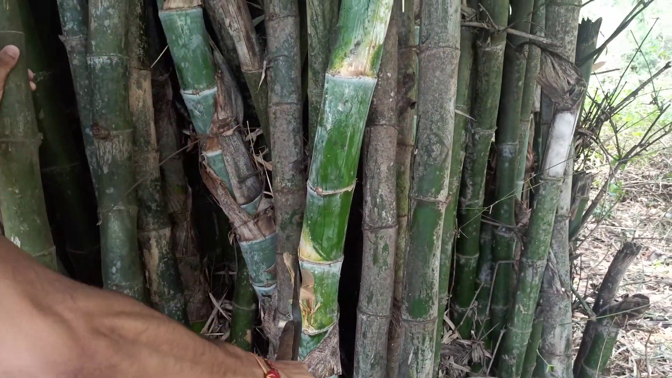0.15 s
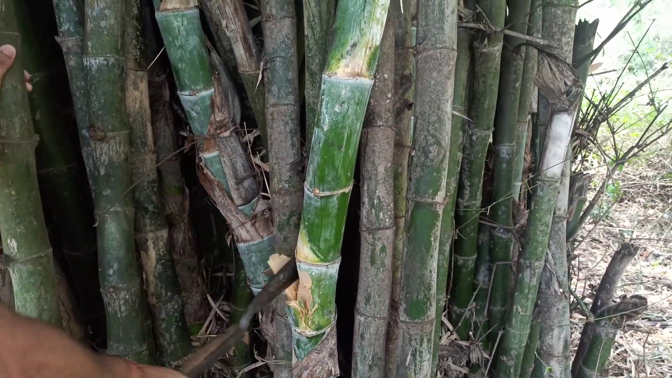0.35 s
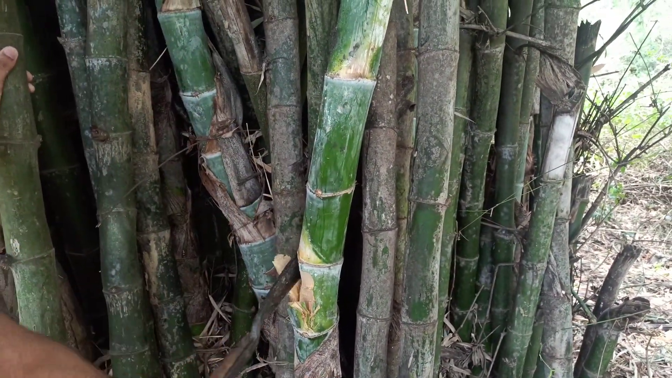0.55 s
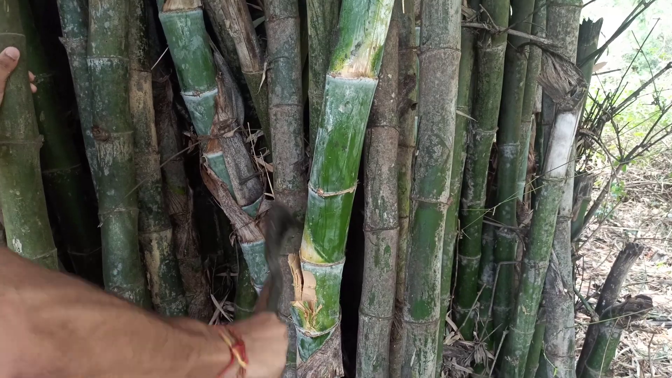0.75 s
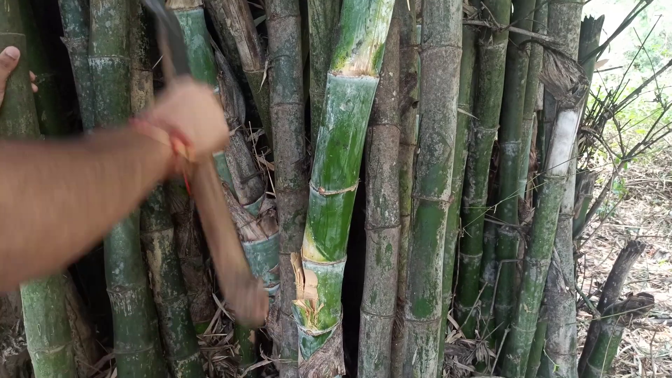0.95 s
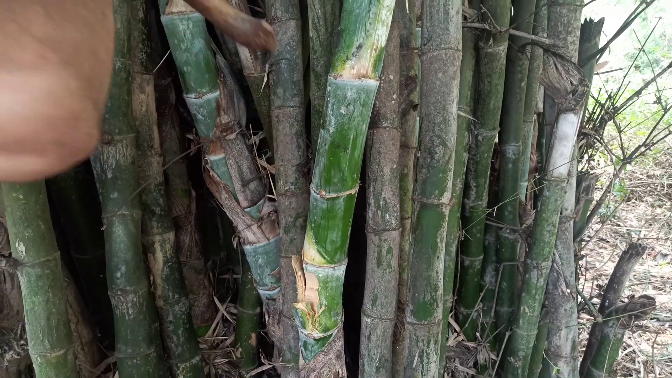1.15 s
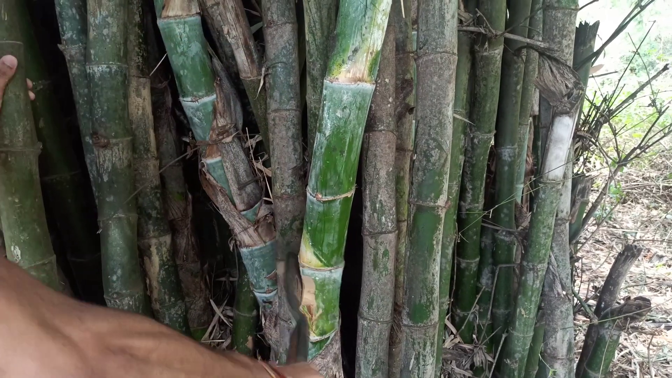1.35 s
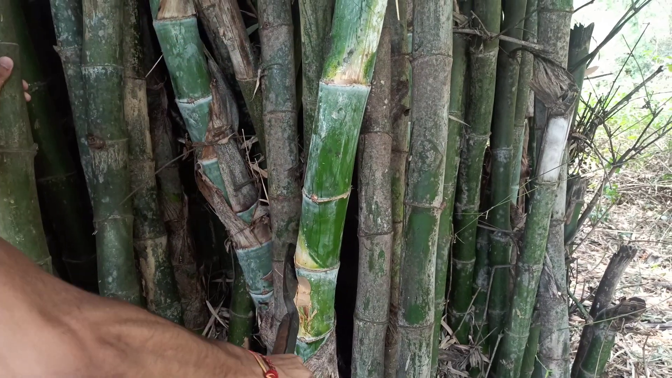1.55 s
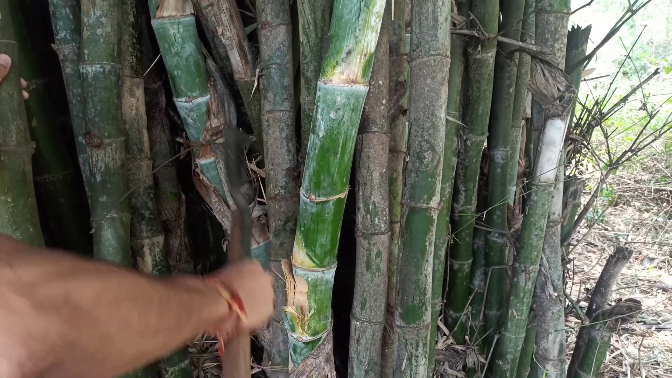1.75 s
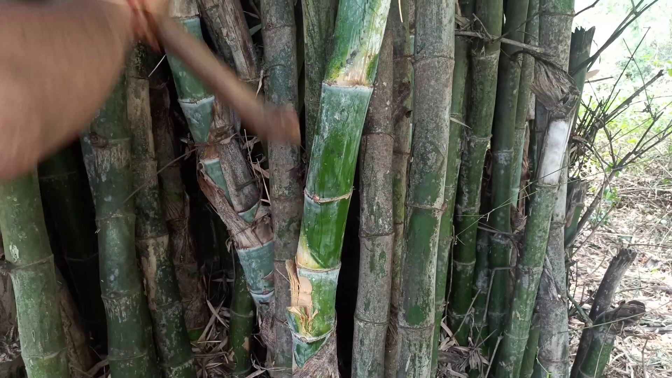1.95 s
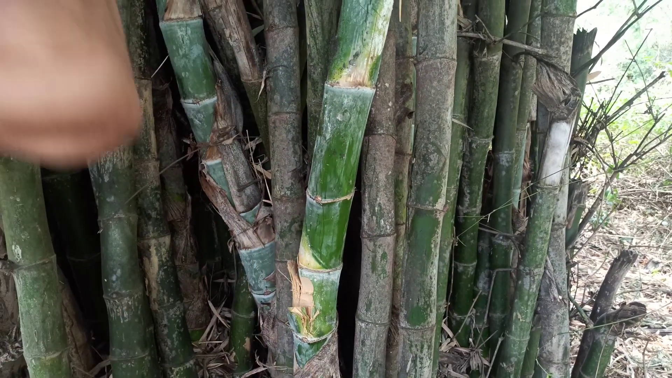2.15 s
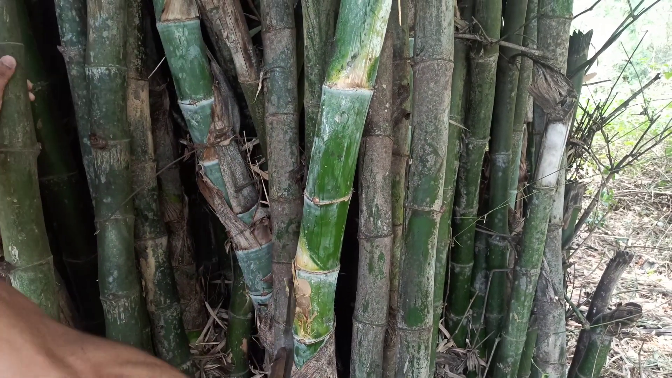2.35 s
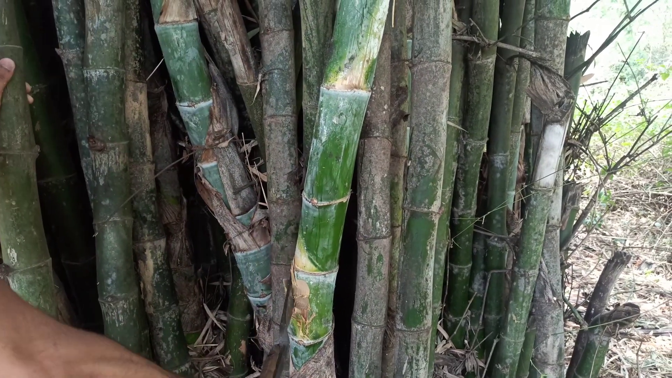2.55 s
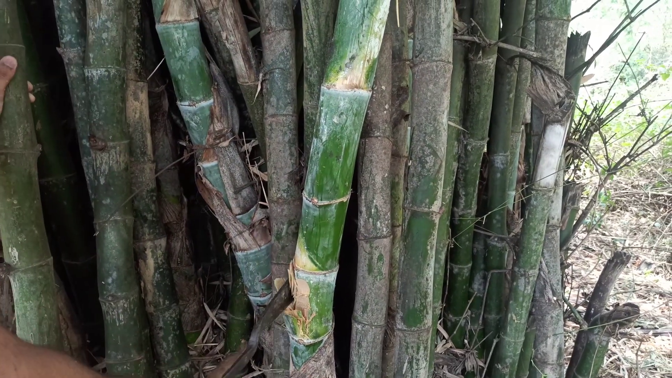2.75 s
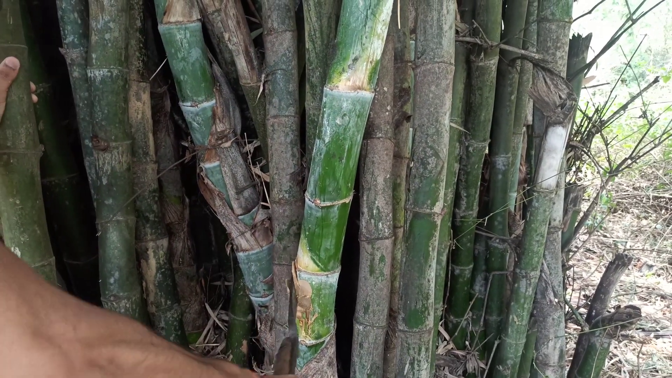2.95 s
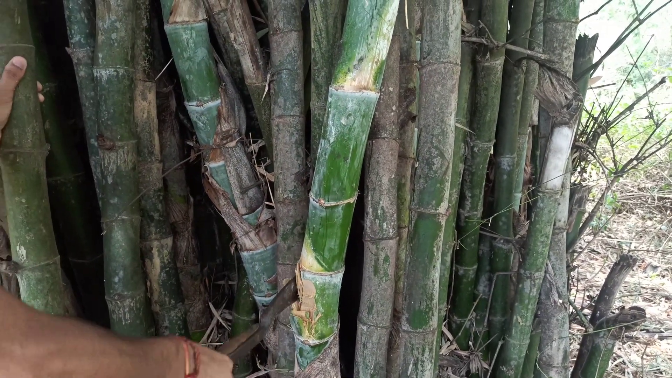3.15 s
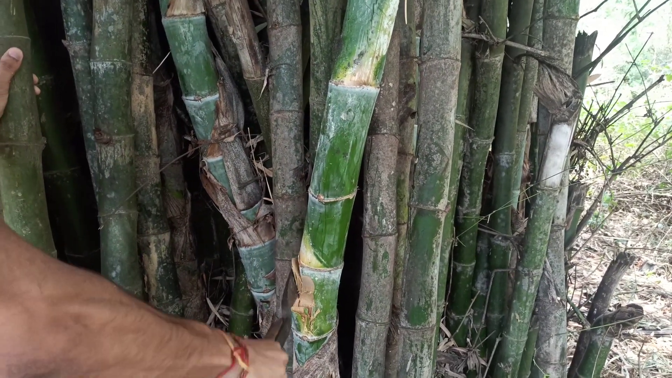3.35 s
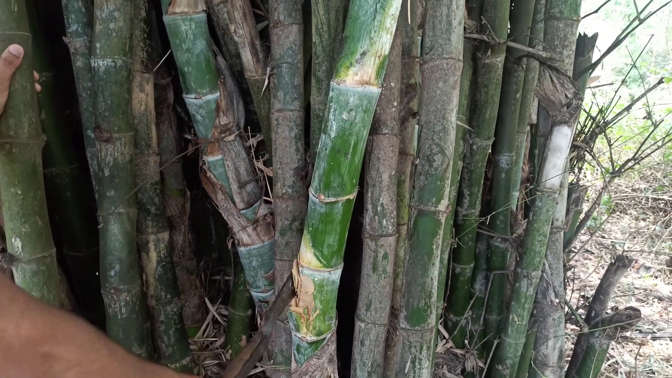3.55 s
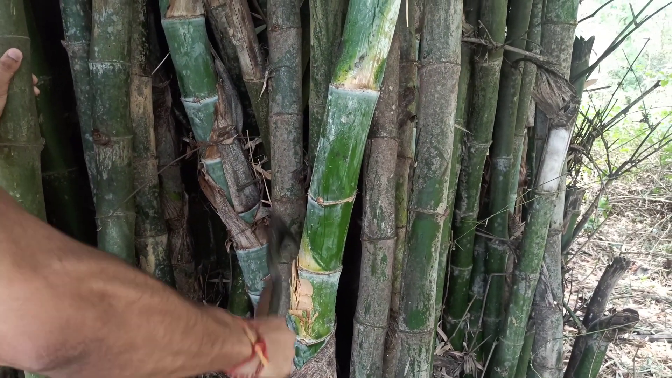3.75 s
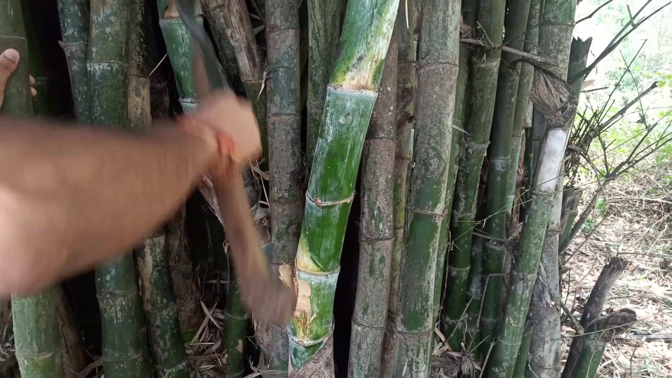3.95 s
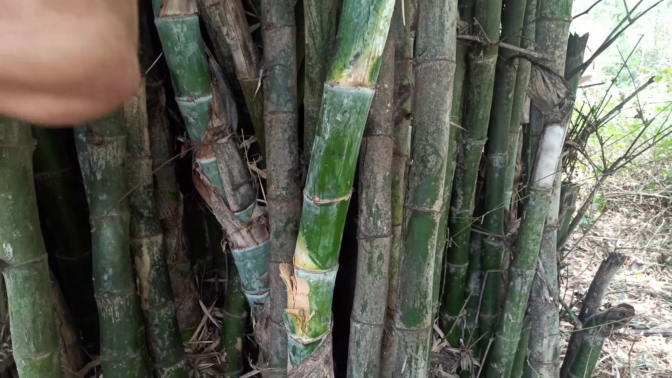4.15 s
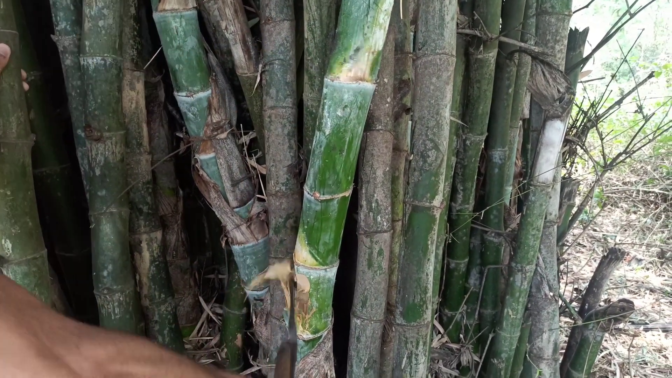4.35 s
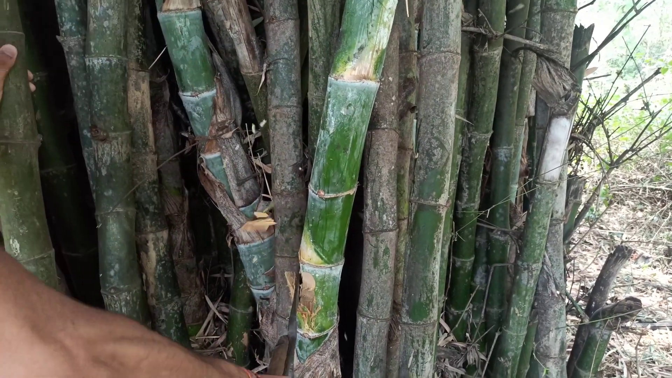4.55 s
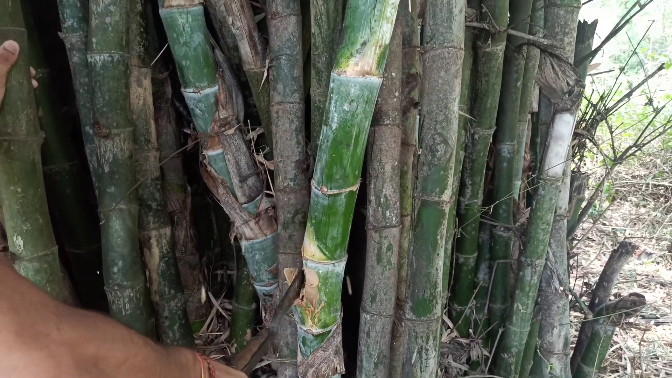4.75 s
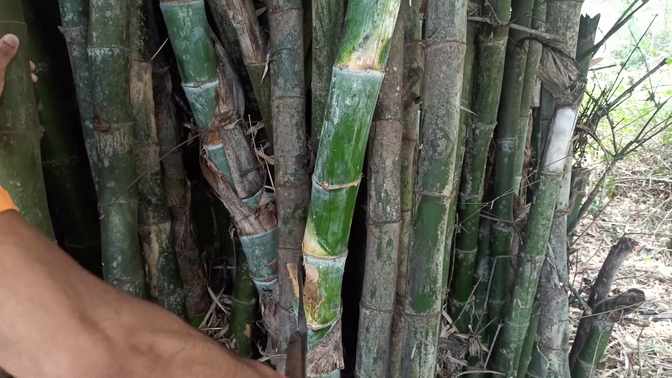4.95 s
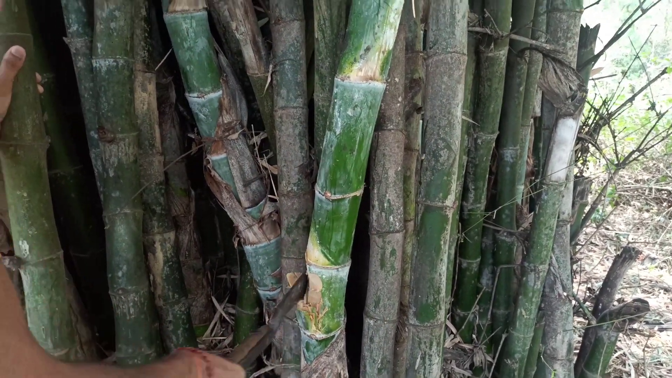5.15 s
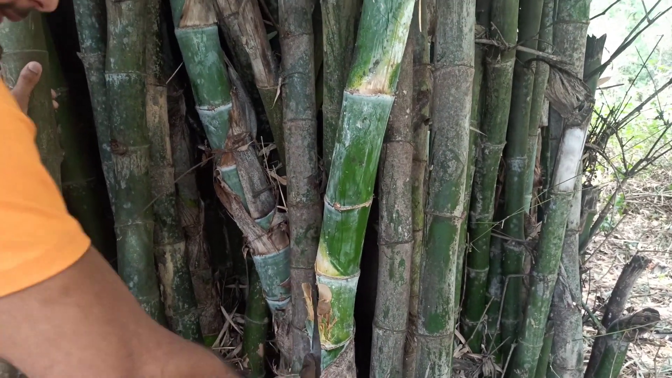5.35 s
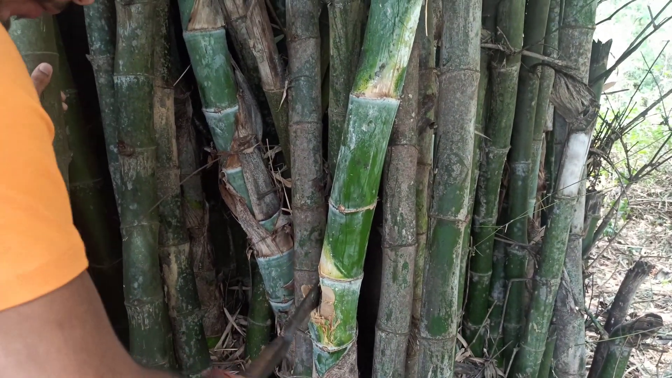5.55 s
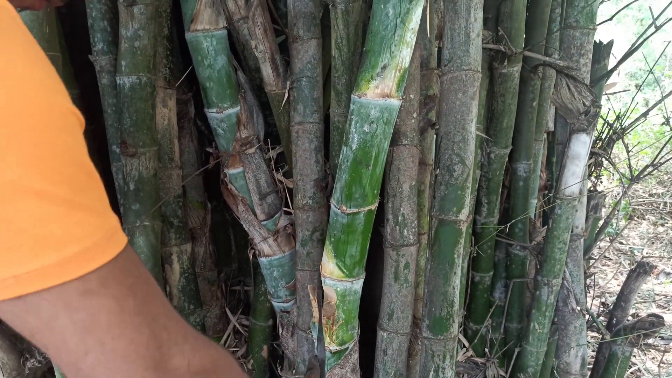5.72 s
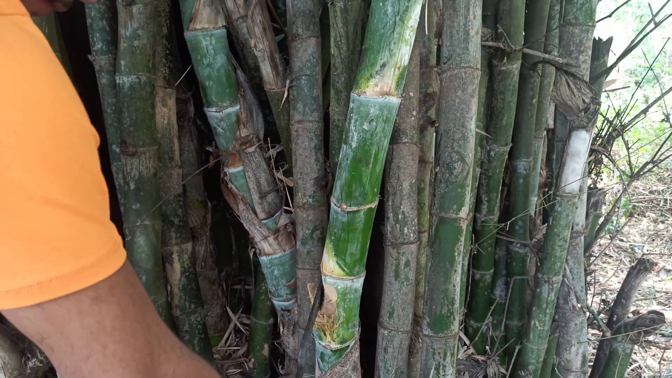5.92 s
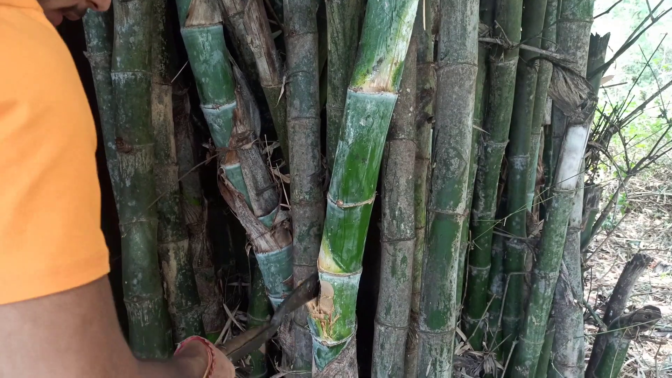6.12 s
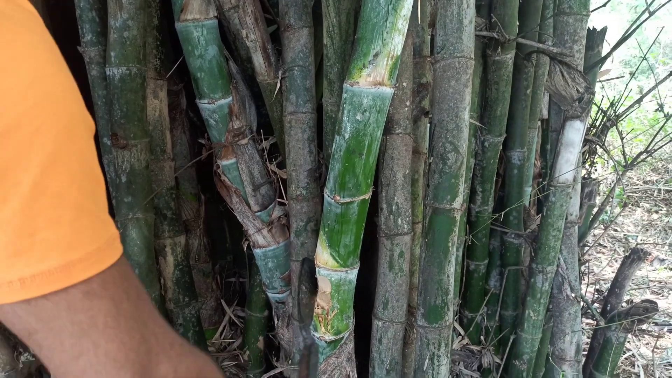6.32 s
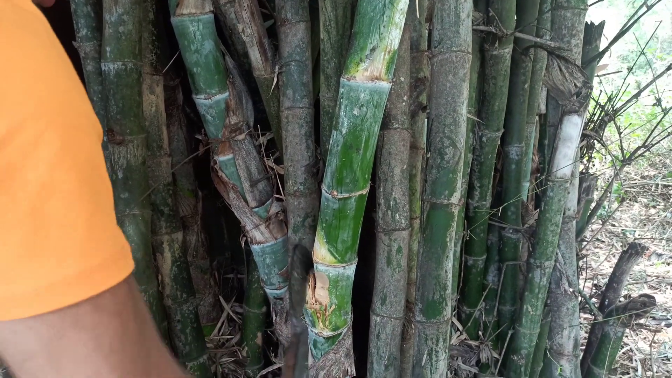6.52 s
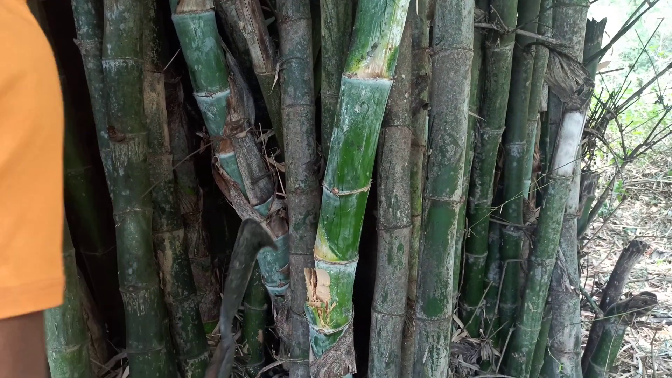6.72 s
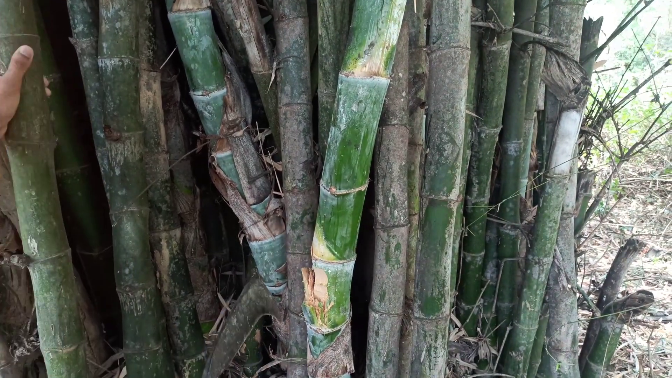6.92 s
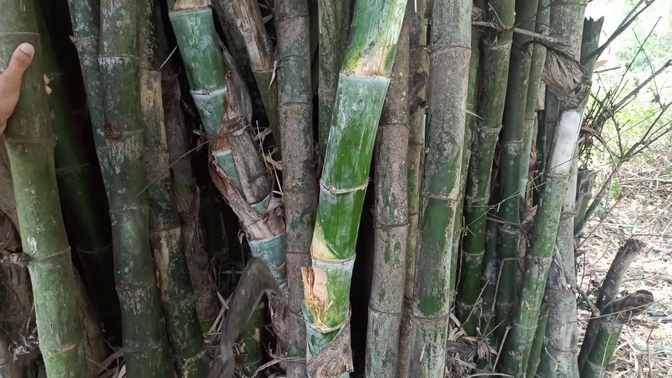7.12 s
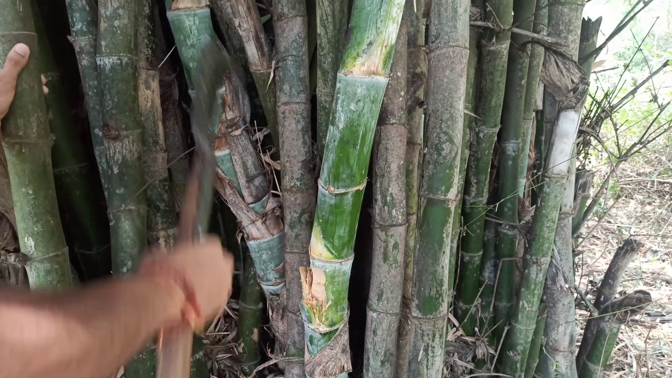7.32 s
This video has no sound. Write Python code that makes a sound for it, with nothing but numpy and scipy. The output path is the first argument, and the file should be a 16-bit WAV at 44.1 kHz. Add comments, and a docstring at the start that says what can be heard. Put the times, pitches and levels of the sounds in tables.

```python
"""A heavy blade chops four times into a green bamboo culm, close by: bursts of fibre noise over damped modes.
The grove's stalks scatter each blow into a decaying noise tail; parting fibres crackle after it.
Between blows the blade scrapes and clinks, splinters snap, dry leaves rustle as random grains,
and cut pieces thud down as damped resonances. A far bird whistles in falling glides and short rising
notes, as sines of gliding pitch, over the faint noise of the grove's air."""
import sys
import numpy as np
from scipy import signal
from scipy.fft import rfft, irfft, next_fast_len
from scipy.io import wavfile
from scipy.ndimage import map_coordinates

SR = 44100
rng = np.random.default_rng(int(sys.argv[2]) if len(sys.argv) > 2 else 0)


def int16_out(signal):
    """Quantize to a 16-bit WAV file."""
    q = np.round(np.clip(np.atleast_2d(signal).T, -1, 1) * 32767)
    wavfile.write(sys.argv[1], SR, q.astype(np.int16))


N = 329868
T = np.arange(SR // 2) / SR  # time base of one event, s


def amp(db):
    """Decibels to gain."""
    return 10 ** (np.asarray(db) / 20)


def unit(x):
    """x at rms 1."""
    return x / np.sqrt(np.mean(x ** 2) + 1e-20)


def along(points, hz):
    """(Hz, value) points interpolated on a log frequency axis."""
    f, v = np.transpose(points)
    return np.interp(np.log(hz + 1), np.log(f + 1), v)


def wobble(rate_hz):
    """A random curve of straight segments, rate_hz knots a second."""
    knots = rng.standard_normal(int(N * rate_hz / SR) + 4)
    return map_coordinates(knots, [np.arange(N) * rate_hz / SR], order=1)


def filtered(x, response):
    """x times a response of frequency."""
    n = x.shape[-1]
    m = next_fast_len(n + 4096)
    return irfft(rfft(x, m) * response(np.fft.rfftfreq(m, 1 / SR)), m)[..., :n]


def resonance(hz, centre_hz, q):
    """Causal band-pass response."""
    damping = 1j * hz * centre_hz / q
    return damping / (centre_hz ** 2 - hz ** 2 + damping)


def spread(pair, gain, alike):
    """Two unrelated signals become left and right, coloured, with the given likeness."""
    def response(hz):
        turn = np.arccos(np.clip(along(alike, hz), -1, 1)) / 2
        return gain(hz) * np.array([np.cos(turn), np.sin(turn)])
    mid, side = filtered(pair, response)
    return np.array([mid + side, mid - side])


def noise(spectrum, alike, size):
    """Coloured stereo noise of rms 1."""
    pair = rng.standard_normal((2, size))
    return unit(spread(pair, lambda hz: amp(along(spectrum, hz)), alike))


def burst(t, rise, t60):
    """An envelope that swells 60 dB in rise s up to t = 0, then dies away 60 dB in t60 s."""
    return amp(-60 * np.where(t < 0, -t / rise, t / t60))


def ring(modes, size, detune):
    """Struck modes; each strike draws new mode strengths, pitches and phases."""
    hz, db, t60 = np.transpose(modes)[..., None]
    strength, shift, phase = rng.standard_normal((3, len(modes), 1))
    t = T[:size]
    decay = amp(db + 2 * strength - 60 * t / t60)
    tones = np.sin(2 * np.pi * (hz * (1 + detune * shift) * t + phase))
    onset = 1 - np.exp(-t / 0.00097)
    return np.sum(decay * tones, 0) * onset


def crackle(rate, spread_db, life_s, size):
    """An envelope of tiny cracks at random moments, rate a second, of random strength."""
    strength = amp(spread_db * np.minimum(rng.exponential(size=size), 4))
    hits = (rng.random(size) < rate / SR) * strength
    return unit(signal.lfilter([1], [1, -np.exp(-1 / (life_s * SR))], hits))


def lagged(x, left_lead_s):
    """A source off to the left reaches that port sooner."""
    return filtered(x, lambda hz: np.exp(1j * np.pi * hz * left_lead_s * np.array([[1], [-1]])))


def add(track, s, sound):
    """Mix a sound into the track at s seconds."""
    start = round(s * SR)
    part = sound[..., max(-start, 0):N - start]
    track[:, max(start, 0):][:, :part.shape[-1]] += part


# Spectrum of the air. Each row: frequency in Hz, relative density in dB.
AIR_SPECTRUM = [(25, -30), (50, -7.5), (90, 3), (130, -1), (250, -7.5), (600, -12.5), (1200, -19),
                (3000, -19), (7000, -17), (15000, -32)]
# Diffuse sound. Each row: frequency in Hz, left-right likeness (1 = identical).
DIFFUSE_LIKENESS = [(25, 0.18), (70, 0.55), (130, 0.4), (290, 0.47), (640, 0.51), (1400, 0.0011), (3000, 0),
                    (15000, 0.62)]


def air():
    """Faint noise from all around, slowly uneven in level."""
    return amp(-55.0 + 1.3 * wobble(1.7)) * noise(AIR_SPECTRUM, DIFFUSE_LIKENESS, size=N)


# Stalk scattering. Each row: frequency in Hz, tail gain in dB.
SCATTER_GAIN = [(40, -22), (110, 9.5), (180, 1.5), (280, 10.5), (480, 2), (750, 6), (1100, -3.5),
                (2200, -3.5), (4200, -10), (7000, -4.5), (14000, -11.5)]
# Tail decay. Each row: frequency in Hz, t60 in s.
GROVE_T60 = [(80, 0.89), (250, 0.23), (600, 0.37), (1500, 0.53), (4000, 0.42), (12000, 0.38)]


def grove(x):
    """Stalks scatter sound into a short dense noise tail, with a brief slight swell at 70 ms."""
    hz, t, z = signal.stft(rng.standard_normal((2, len(T))), SR, nperseg=256)
    swell = np.exp(-((t - .07) / 0.0072) ** 2)
    swell_db = along([(300, 2.8), (1200, 0.89), (5000, 2.8)], hz)[:, None] * swell
    decay_db = -60 * t / along(GROVE_T60, hz)[:, None]
    tail = signal.istft(z * amp(swell_db + decay_db), SR, nperseg=256)[1][:, :len(T)]
    tail = tail * (1 - np.exp(-T / 0.0021))
    tail = tail / np.linalg.norm(tail[0])
    tail = spread(tail, lambda f: amp(along(SCATTER_GAIN, f)), DIFFUSE_LIKENESS)
    return signal.fftconvolve(x, tail, axes=1)


def scatter(x):
    """A fresh tail for each stretch of sound, as the source shifts among the stalks."""
    out, step = np.zeros((2, N)), SR * 2 // 3
    for start in range(0, N, step):
        add(out, start / SR, grove(x[:, start:start + step]))
    return out


def all_round(source, count):
    """A breaking wall radiates differently in each direction, and other stalks answer each one."""
    return sum(scatter(source()) for _ in range(count)) / np.sqrt(count)


# Falling whistles. Each row: start in seconds, length in s, end pitch in Hz, relative level in dB.
WHISTLES = [(2.099, 0.26, 3750, -61), (2.928, 0.18, 2270, -65), (3.448, 0.29, 3585, -59.5),
            (3.732, 0.25, 3406, -64.5)]
# Short rising notes. Each row: start in seconds, end pitch in Hz, relative level in dB.
FLICKS = [(3.602, 4550, -59), (3.785, 4500, -67), (3.865, 4650, -63), (4.29, 3900, -57.5)]
WHISTLE_FALL_HZ = 720  # start above end pitch
FLICK_S, FLICK_RISE_HZ = .065, 507  # length; start below end pitch


def bird():
    """Each note glides quickly, then levels off, quavering in pitch and strength."""
    out, quaver, flutter = np.zeros((2, N)), wobble(70), amp(3 * wobble(45))
    falling = [(s, length, WHISTLE_FALL_HZ, hz, db) for s, length, hz, db in WHISTLES]
    rising = [(s, FLICK_S, -FLICK_RISE_HZ, hz, db) for s, hz, db in FLICKS]
    for s, length, glide_hz, end_hz, db in falling + rising:
        u = np.linspace(0, 1, int(length * SR))
        now = slice(int(s * SR), int(s * SR) + len(u))
        hz = (end_hz + glide_hz * (1 - u) ** 4) * (1 + 0.0075 * quaver[now])
        shape = np.abs(np.sin(np.pi * u ** 0.62)) ** .5
        tone = np.sin(2 * np.pi * np.cumsum(hz) / SR)
        add(out, s, amp(db + 6.5) * flutter[now] * shape * tone)
    return out


# Stirring of dry leaves and fibres. Each row: time in seconds, relative level in dB.
STIR = [(0.2, -64), (0.44, -45.5), (0.62, -57.5), (1.15, -57.5), (1.62, -50.5), (1.88, -59), (2.33, -56.5),
        (2.66, -47), (3.0, -58.5), (3.85, -66.5), (4.35, -60), (4.98, -44.5), (5.45, -49), (5.75, -55.5),
        (6.02, -48.5), (6.42, -58.5), (6.9, -52.5), (7.2, -44), (7.48, -51.0)]


def stirring(s):
    """Stirring level in dB at s seconds, interpolated between rows."""
    return np.interp(s, *np.transpose(STIR))


# Spectrum of the leaves. Each row: frequency in Hz, relative density in dB.
LEAF_SPECTRUM = [(60, -40), (300, -4.5), (1000, -3), (2400, -6.5), (4200, 2.5), (7000, 7.5), (11000, -5.5),
                 (15000, 0.5)]
RUSTLE_OVER_STIR_DB, RUSTLE_SWAY_DB = 5, 1.5


def rustle():
    """Countless tiny cracks of dry leaves, with sparser, more uneven ones among them."""
    level_db = stirring(np.arange(N) / SR) + RUSTLE_OVER_STIR_DB + RUSTLE_SWAY_DB * wobble(9)
    fine = crackle(rate=460, spread_db=1.5, life_s=0.0019, size=N)
    coarse = crackle(rate=36, spread_db=6.5, life_s=0.0053, size=N)
    leaves = noise(LEAF_SPECTRUM, [(300, 0.56), (3000, 0.16), (12000, 0.37)], size=N)
    grains = unit((fine + 0.67 * coarse + .5) * leaves)
    return lagged(amp(level_db + 0.14 * wobble(45)) * grains, left_lead_s=0.000223)


# Near sound. Each row: frequency in Hz, left-right likeness (1 = identical).
DIRECT_LIKENESS = [(40, .6), (130, 1), (500, 1), (2000, 0.81), (7000, 0.41), (15000, 0.22)]
# Landing chips and chunks. Each row: start in seconds, relative level in dB, pitch in Hz,
# relative litter crunch in dB.
THUDS = [(0.629, -38.5, 1180, -7), (0.992, -36, 1130, -5.5), (3.701, -41, 740, -1), (4.734, -35, 900, -33),
         (4.841, -27.5, 900, 4.5), (5.0857, -7, 520, -12), (5.0984, -11, 574, -11), (6.075, -44, 600, -18),
         (6.207, -36, 686, -8), (6.586, -31.5, 473, -8.5), (6.602, -35.5, 433, -15)]
# Short bamboo piece on soil. Each row: multiple of its pitch, relative level in dB, sharpness Q.
CHUNK_MODES = [(.55, 3.5, 1.96), (1.05, 5, 2.7), (1.75, 5, 5.8), (3.5, -13.5, 3.3)]


def thuds():
    """A piece of bamboo lands: a quickly damped knock, grit grinding under it, and a crunch of litter."""
    out, t = np.zeros((2, N)), T[:SR // 8]
    litter_spectrum = [(300, -8.0), (1500, 2.5), (2800, -3.5), (4200, 4.0), (7000, 8), (15000, -9.5)]
    for s, db, hz, crunch_db in THUDS:
        grit = amp(-18.5 - 60 * t / 0.027) * rng.standard_normal(len(t))
        contact = 1. * (t == 0) + grit

        def body(f):
            return sum((-1) ** k * amp(level) * resonance(f, ratio * hz, q)
                       for k, (ratio, level, q) in enumerate(CHUNK_MODES))

        # soft contact dulls the treble
        knock = filtered(contact, lambda f: body(f) / (1 + 1j * f / (5.1 * hz)))
        litter = noise(litter_spectrum, DIRECT_LIKENESS, size=len(t))
        crunch = amp(crunch_db) * burst(t - .001, rise=0.011, t60=0.14) * litter
        add(out, s, amp(db) * (0.075 * unit(knock) + crunch))
    return out


TWIGS_PER_S, TWIG_OVER_STIR_DB, TWIG_SPREAD_DB, TWIG_WOOD_DB = 6, 18.5, 0.5, -17.5


def twigs():
    """Lesser snaps at uneven intervals, stronger the more the litter is stirred: rows as in SNAPS."""
    draws = rng.random((80, 3))
    times = (np.arange(len(draws)) + draws[:, 0]) / TWIGS_PER_S
    strength_db, wood_db = TWIG_SPREAD_DB * (2 * draws[:, 1:].T - 1)
    levels_db = stirring(times) + TWIG_OVER_STIR_DB + strength_db
    rows = np.transpose([times, levels_db, TWIG_WOOD_DB + wood_db])
    return rows[times < N / SR]


# Clearest splinter and twig snaps. Each row: start in seconds, relative level in dB,
# relative wood level under the tick in dB.
SNAPS = [(0.2862, -22, -39), (0.4259, -13, -43), (0.5488, -29.5, -12), (0.7556, -17, -15.5),
         (0.8006, -26.5, -28), (0.846, -35.5, -7), (0.928, -35.5, -11.5), (1.1808, -24.5, -19),
         (1.4045, -20.5, -4), (1.5574, -28.5, -1), (1.8305, -32, -6), (1.9475, -21.5, -51),
         (2.0703, -15, -21.5), (2.5052, -16, -17.5), (2.7819, -23.5, -21), (2.811, -24.5, -21.5),
         (2.9219, -28, -20.5), (2.9741, -28, -24), (4.131, -34, -13.5), (4.782, -23.5, -16.5),
         (4.9533, -22.5, -6.5), (4.9654, -6, -25), (5.7184, -23.5, -35), (5.8708, -32.5, -17),
         (6.0095, -18.5, -33), (6.0324, -22, -19.5), (6.1564, -22, -25), (6.2058, -23.5, -14),
         (6.5365, -32.5, -12), (7.0982, -23, -40), (7.1796, -21, -39), (7.3667, -28, -19.5)]
# Spectrum of breaking fibre. Each row: frequency in Hz, relative density in dB.
SPLINTER_SPECTRUM = [(100, -40), (1200, -52), (2800, -15), (4200, -4), (7000, 3), (9500, 6.5), (15000, -23)]
SNAP_BODY_DB, SNAP_LEFT_OVER_RIGHT_DB = -5, -1.5
# less wood than THIN_WOOD_DB tilts the tick brighter: dB per octave for each dB
THIN_WOOD_DB, THIN_TILT = -21.5, 0.4


def snaps(rows):
    """A sharp tick of breaking fibre, brighter when thinner, with the short knock of the wood that held it."""
    out, t = np.zeros((2, N)), T[:SR // 12] - .005
    size = len(t)
    middle_spectrum = [(700, -17), (1500, 1.5), (2600, 0.5), (4500, -6.0)]
    body_spectrum = [(120, -9.5), (330, 0.0), (900, 4.0), (2000, -46.5)]
    for s, db, wood_db in rows:
        fraying = amp(-0.5) * burst(t, rise=0.0066, t60=0.056)
        crack = burst(t - .0008, rise=0.016, t60=0.0049) + fraying
        tilt_db = THIN_TILT * (THIN_WOOD_DB - wood_db)
        tick = [(hz, level + tilt_db * np.log2(hz / 7000)) for hz, level in SPLINTER_SPECTRUM]
        middle = amp(wood_db + 7) * noise(middle_spectrum, DIRECT_LIKENESS, size)
        body = amp(wood_db + SNAP_BODY_DB) * noise(body_spectrum, DIRECT_LIKENESS, size)
        knock = (middle + body) * burst(t - .001, rise=0.0092, t60=0.055)
        add(out, s + t[0], amp(db - 8) * (crack * noise(tick, DIRECT_LIKENESS, size) + knock))
    return out * amp(np.array([[.5], [-.5]]) * SNAP_LEFT_OVER_RIGHT_DB)


# Blade dragging through split fibre. Each row: time of the strongest rub in seconds, 60 dB swell in s,
# 60 dB fade in s, relative level in dB, relative rasp in dB.
SCRAPES = [(0.395, 1, 0.24, -35, -13.5), (2.765, 0.73, 0.1, -38.5, -14), (3.19, 0.47, 0.48, -40.5, -18),
           (3.400, 0.16, 0.11, -31.5, -12.5), (4.133, .04, 0.046, -31.5, -14),
           (4.850, 0.017, 0.17, -25, -10.5), (6.065, 0.045, 0.085, -32, -12.5),
           (7.114, 0.12, 0.13, -30.5, -14), (7.329, 0.72, 0.61, -38.5, -34)]


def scrapes():
    """Fibres catch and slip on the flat of the blade: a grainy swell with a woody rasp under it."""
    out, t = np.zeros((2, N)), T - .25
    size = len(t)
    hiss_spectrum = [(1000, -27.0), (2800, -9.5), (4200, -0.5), (7000, 4), (15000, -10.0)]
    rasp_spectrum = [(120, -11), (350, 1.5), (1000, -5), (1700, -4.0), (3500, -9.0)]
    for s, swell_s, fade_s, db, rasp_db in SCRAPES:
        hiss = noise(hiss_spectrum, DIRECT_LIKENESS, size)
        rasp = amp(rasp_db) * noise(rasp_spectrum, DIRECT_LIKENESS, size)
        slips = unit(0.5 + crackle(rate=700, spread_db=5.5, life_s=0.0024, size=size))
        add(out, s + t[0], amp(db) * burst(t, swell_s, fade_s) * slips * (hiss + rasp))
    return out * amp([[-1], [1]])  # right side 2 dB stronger


# Steel blade modes. Each row: frequency in Hz, relative level in dB, t60 in s.
BLADE_MODES = [(3640, -7, 0.028), (3820, 0.5, 0.011), (4550, -1.5, .025), (4360, -5, 0.02), (5130, 5, .025),
               (6450, 13, 0.052), (6600, -23.5, .03)]
# Blade knocking in the cut. Each row: start in seconds, relative level in dB, most favoured frequency in Hz.
CLINKS = [(0.757, -29, 4380), (1.4445, -11, 4550), (1.46, -17.5, 4500), (1.557, -14, 3800),
          (2.505, -18, 4100), (4.553, -29, 4304)]


def clinks():
    """The loose blade touches the cut; each contact favours some of its modes, and the wood soon damps them."""
    out = np.zeros((2, N))
    for s, db, bright_hz in CLINKS:
        modes = [(hz, level - 45 * abs(np.log(hz / bright_hz)), t60) for hz, level, t60 in BLADE_MODES]
        add(out, s, amp(db) * ring(modes, size=SR // 8, detune=0.019))
    return out


# Blows of the blade. Each row: start in seconds, crack in dB, split delay in s, split in dB,
# last tear delay in s, tear in dB, culm ring in dB, low push in dB; all levels relative.
CHOPS = [(0.0226, -4.5, 0.0034, -16, 0.0084, -1.5, -16, -44.5),
         (1.4194, -3.5, 0.0016, -17.5, 0.0097, -3.5, -17, -37.5),
         (2.3627, -5.5, 0.0048, 1, 0.014, -10, -27, -44),
         (4.405, -5.5, 0.0016, 1.5, 0.0051, -13, -21.5, -24)]
SPLINTERING_DB, SPLINTERING_RISE_S, SPLINTERING_T60_S = -28.5, 0.1, 0.31


def splintering():
    """The cut gapes after each blow: strained fibres part in a coarse crackle that soon dies away."""
    out, t = np.zeros((2, N)), T - .05
    spectrum = [(200, -12), (700, 2.5), (2000, -4), (4500, -1.5), (7500, -2), (15000, -13)]
    for s, *_ in CHOPS:
        grains = crackle(rate=260, spread_db=3.0, life_s=0.00066, size=len(t))
        wood = noise(spectrum, DIRECT_LIKENESS, size=len(t))
        envelope = amp(SPLINTERING_DB) * burst(t, SPLINTERING_RISE_S, SPLINTERING_T60_S)
        add(out, s + .02 + t[0], envelope * grains * wood)
    return out


# Hollow culm modes. Each row: frequency in Hz, relative level in dB, t60 in s.
CULM_MODES = [(113, -8.5, 0.067), (212, -6, .07), (250.7, -3, 0.28), (302, -3.5, 0.068), (407, -25, 0.048),
              (582, 2, 0.075), (712, 1.5, 0.16), (801, 8.5, 0.056), (900, 6, .04), (1016, -17.5, 0.11),
              (1434, 4, 0.11), (1650, 9, 0.076), (2070, 14.5, 0.051), (2345, -25, 0.085),
              (2840, 17.5, 0.012)]


def rings():
    """Each blow shoves the stalk once and sets the hollow culm ringing."""
    out, t = np.zeros((2, N)), T - .02
    u = t / .003
    push = -u * np.exp(-u ** 2 / 2)
    for s, *_, culm_db, push_db in CHOPS:
        add(out, s, amp(culm_db - 13.5) * ring(CULM_MODES, size=len(T), detune=0.023))
        add(out, s + t[0], amp(push_db) * push)
    return out


# Spectrum of the crack. Each row: frequency in Hz, relative density in dB.
CRACK_SPECTRUM = [(30, -44.5), (70, -34), (150, -11.5), (280, -2.5), (500, -10.5), (900, -7), (1600, -6),
                  (2500, -6.5), (4000, 2.5), (7000, 0), (9000, -0.5), (15000, -23.5)]


def cracks():
    """The edge bites and crushes the skin, the wall splits, the last fibres tear."""
    out, t = np.zeros((2, N)), T - .02
    for s, db, split_s, split_db, tear_s, tear_db, _, _ in CHOPS:
        bite = burst(t - .0008, rise=0.0072, t60=0.023)
        split = amp(split_db) * burst(t - split_s, rise=0.0029, t60=0.033)
        tear = amp(tear_db) * burst(t - tear_s, rise=0.0013, t60=0.024)
        crush = amp(-14) * burst(t, rise=.03, t60=.08)
        envelope = np.sqrt(bite ** 2 + split ** 2 + tear ** 2 + crush ** 2)
        # each fibre parts on its own
        fibres = unit(2.0 + crackle(rate=2520, spread_db=0.5, life_s=0.000084, size=len(t)))
        add(out, s + t[0], amp(db) * envelope * fibres * noise(CRACK_SPECTRUM, DIRECT_LIKENESS, size=len(t)))
    return out


def scene():
    """Near sounds reach the left port first; blows, small sounds and bird carry into the grove."""
    wood, landings, song = rings(), thuds(), bird()
    small = snaps(SNAPS) + snaps(twigs()) + scrapes() + clinks()
    near = lagged(cracks() + splintering() + wood + small, left_lead_s=4.8e-5)
    near = near + lagged(landings, left_lead_s=0.00011)
    chop_tails = amp(-3.5) * all_round(cracks, count=4)
    echoes = scatter(amp(-16.5) * wood + amp(-11.5) * small + amp(-27.5) * landings + amp(5) * song)
    return near + chop_tails + echoes + amp(-12) * song + rustle() + air()


# Uneven treble of the recorder. Each row: frequency in Hz, gain in dB.
MIC_TREBLE = [(4720, 0), (4900, -7), (6000, -7), (6200, 0), (7600, -1), (7900, -9), (8450, -10),
              (8900, -28), (11300, -32), (11650, -5), (15800, -5), (16150, -30)]
# Side balance. Each row: frequency in Hz, left over right in dB.
LEFT_OVER_RIGHT = [(40, -17), (100, 2.5), (220, 2), (800, 0), (2200, 0.5), (4400, -3.5), (8000, -3),
                   (13000, 1.5)]
LOW_CUT_HZ, TOP_HZ = 56, 16700


def record(dry):
    """The recorder thins the bass, tilts the side balance, rounds off peaks and colours the treble up to TOP_HZ."""
    def port_response(hz):
        low_cut = (1j * hz / (LOW_CUT_HZ + 1j * hz)) ** 2
        return low_cut * amp(np.array([[.5], [-.5]]) * along(LEFT_OVER_RIGHT, hz))
    ports = filtered(dry, port_response)
    rounded = ports / (1 + (ports / 1.15) ** 6) ** (1 / 6)
    return filtered(rounded, lambda hz: amp(along(MIC_TREBLE, hz)) * (hz < TOP_HZ))


dry = scene()
out = record(dry)
int16_out(out)
```